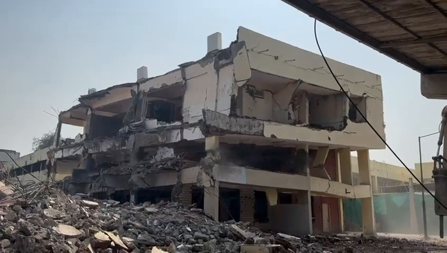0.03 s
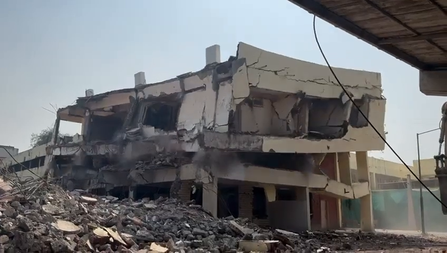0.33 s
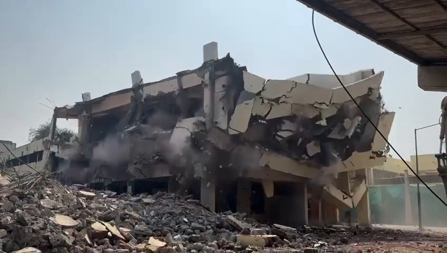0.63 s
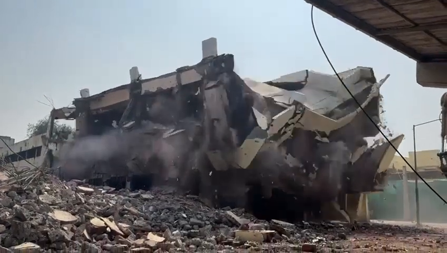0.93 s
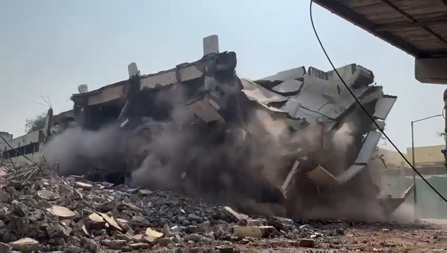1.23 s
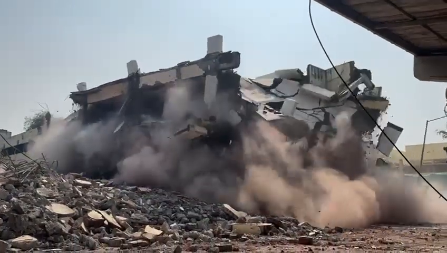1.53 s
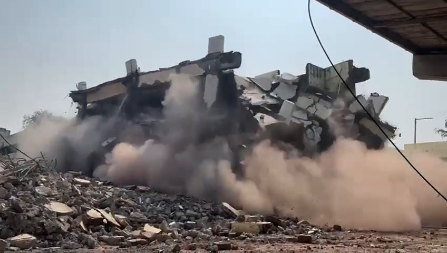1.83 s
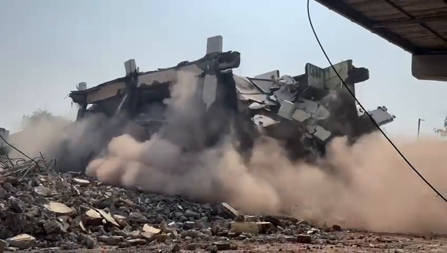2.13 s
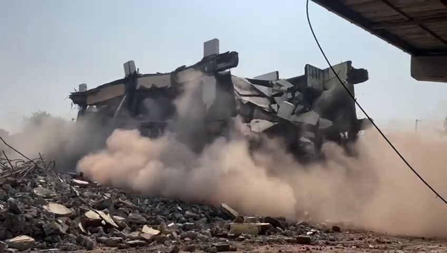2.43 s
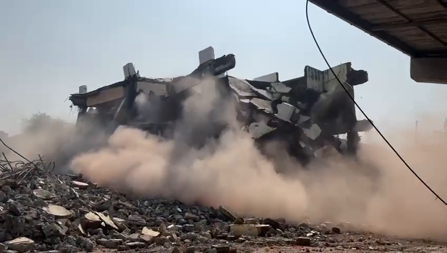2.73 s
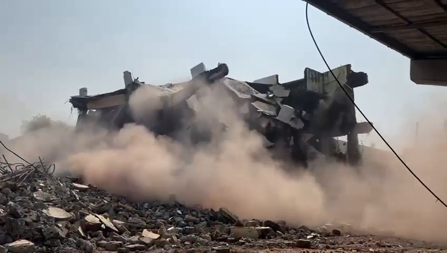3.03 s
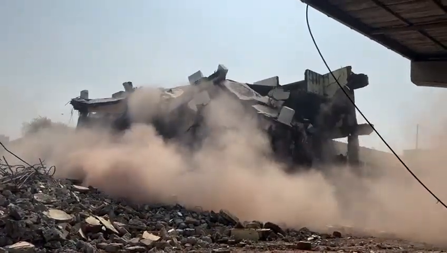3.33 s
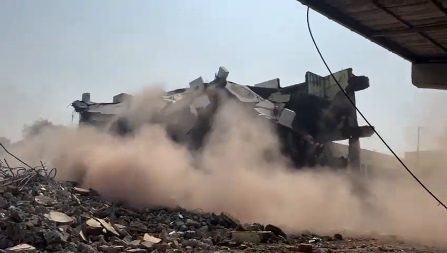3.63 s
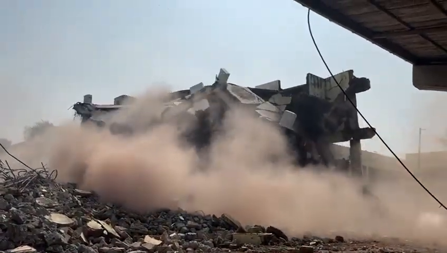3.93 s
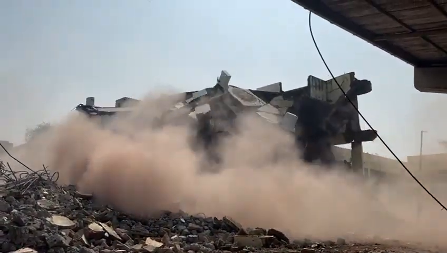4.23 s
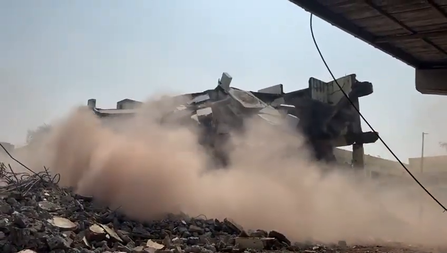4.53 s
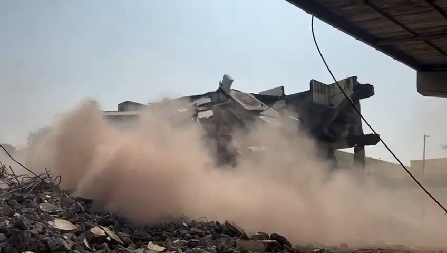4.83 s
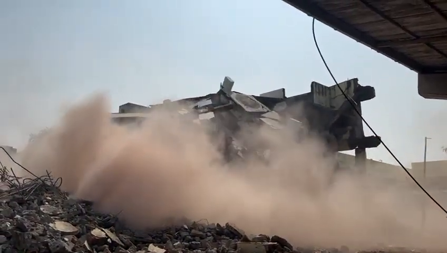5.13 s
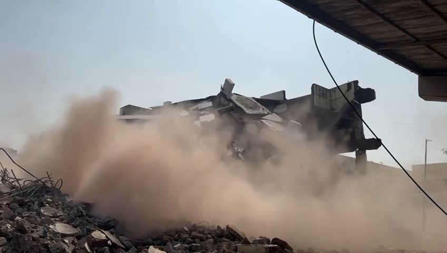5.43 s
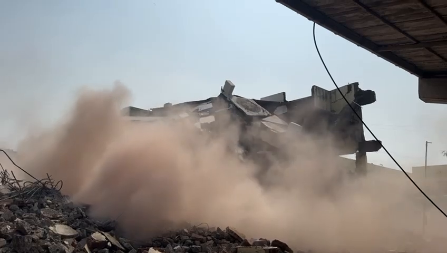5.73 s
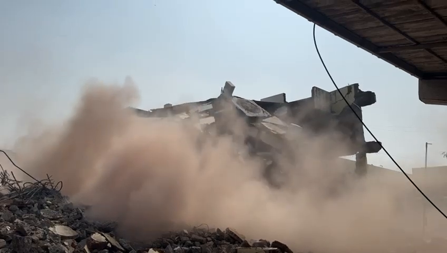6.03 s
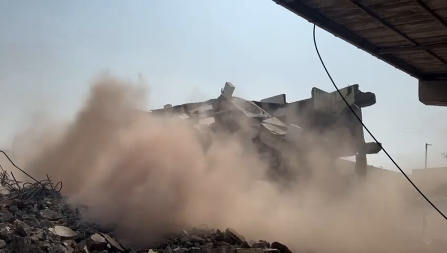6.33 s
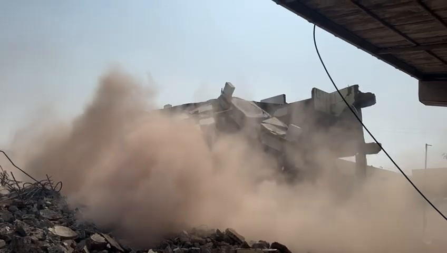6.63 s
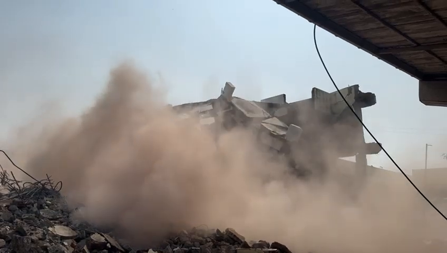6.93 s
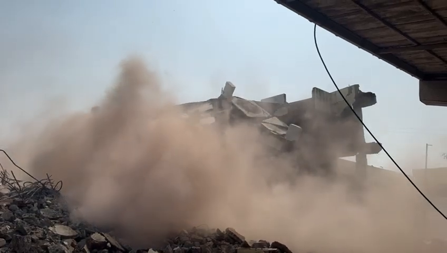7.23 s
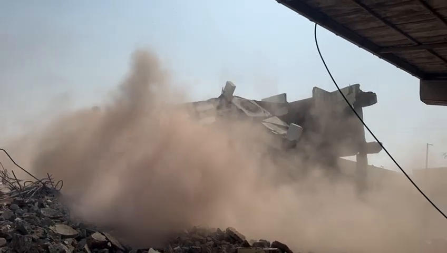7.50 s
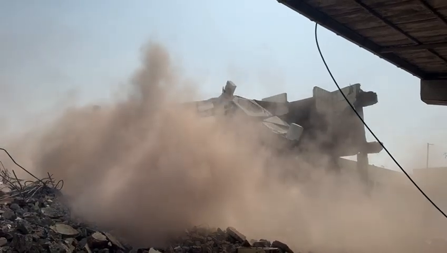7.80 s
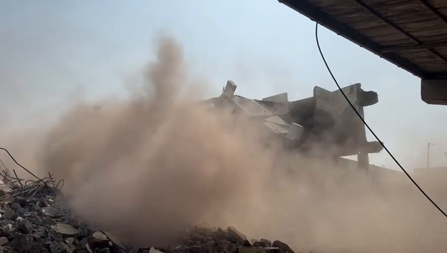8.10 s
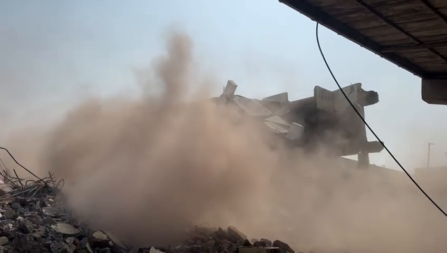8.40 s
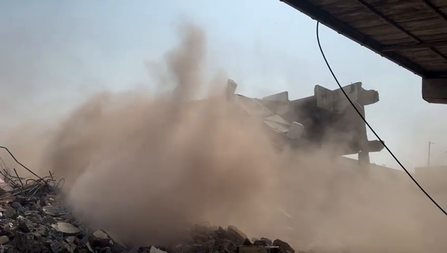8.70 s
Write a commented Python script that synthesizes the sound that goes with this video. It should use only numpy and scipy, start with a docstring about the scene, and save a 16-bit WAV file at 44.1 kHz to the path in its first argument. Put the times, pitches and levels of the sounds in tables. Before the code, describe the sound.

On an open demolition site, a stereo microphone some way off picks up a building collapsing. Deep booms and heavy thuds come in quick succession inside a dense roar of crunching concrete and hissing grit. The noise slowly dies down into scattered clacks, clinks, scrapes and small metal squeaks with short echoes. Behind the settling rubble, a quiet diesel engine speeds up briefly and falls back to idle.

```python
"""An open demolition site, some tens of metres from a concrete building, on a close-set stereo microphone.
The building caves in at once: section after section booms over a roar of colliding chunks and chips,
while slabs thud and gravel spills. From two seconds on the roar thins, and blocks knock and scrape,
shards clink and steel bars squeak in the clear. Near five seconds a diesel machine revs in the background;
by seven it has dropped to a low drone, and the last pieces tumble as the rubble settles."""
import sys
import numpy as np
from scipy import signal
from scipy.fft import rfft, irfft
from scipy.io import wavfile

SR = 44100
rng = np.random.default_rng(int(sys.argv[2]) if len(sys.argv) > 2 else 0)


def file_out(sig):
    """Save sig as 16-bit WAV at sys.argv[1]."""
    # one column per channel
    cols = np.atleast_2d(sig).T
    # limit, then scale
    lim = np.clip(cols, -1, 1)
    pcm = np.round(lim * 32767).astype(np.int16)
    wavfile.write(sys.argv[1], SR, pcm)


N = 395136
TIME = np.arange(N) / SR

# how much rubble is on the move: (time [s], relative level [dB])
RUBBLE_FLOW = [(0, -3), (.11, -6), (.4, -2), (.55, -1), (.7, 0.5), (.87, -1.5), (1.0, -2), (1.09, -3),
               (1.17, -0.5), (1.5, -1), (1.72, -5.5), (2.15, -8.5), (4.1, -14.5), (5.1, -17.5),
               (6.4, -19.5), (7.4, -24.5), (7.9, -30), (8.45, -28.5), (8.96, -28)]
# sections giving way: (time [s], length [s], boom of the floors [dB], crunch of the slabs [dB])
CRASHES = [(0, 0.031, -24, -19), (0.147, 0.032, -14.5, -18.5), (0.217, 0.22, -21, -21.5),
           (0.423, 0.078, -15, -22.5), (0.575, 0.25, -16, -21.5), (0.863, 0.056, -14, -38),
           (1.115, 0.2, -18, -16), (1.346, 0.24, -15.5, -17.5), (1.597, 0.049, -22, -23),
           (1.778, 0.31, -28.5, -26), (2.186, 0.044, -18, -22.5), (2.337, 0.32, -25, -26.5),
           (2.986, 0.36, -40, -32), (4.168, 0.22, -42, -30.5), (5.2, 0.52, -50, -40),
           (6.785, 0.029, -33, -44)]
# colour of the roar, and a trim for the sand at its top: (frequency [Hz], relative level [dB])
ROAR_SPECTRUM = [(18, -37), (30, -13.5), (70, 7.5), (118, -4.5), (169, -4), (502, -12), (592, -14),
                 (974, -12), (1180, -15), (1720, -17.5), (2340, -22), (8600, -33), (11200, -65),
                 (18900, -120)]
SAND_TRIM = [(5000, -2.5), (8300, -2.5), (10300, -3.5)]
# heavy slabs landing: (time [s], level [dB], pitch [Hz], swell [s])
THUDS = [(.367, -7.5, 233, .015), (.452, -13, 109, 0.01), (0.765, -8, 48, 0.015), (1.12, -7.5, 313, 0.0045),
         (1.122, -1.5, 136, .013), (1.182, -7, 234, 0.0055), (1.225, -6, 176, 0.0083),
         (1.251, -5, 300, 0.0042), (1.273, -6, 100, 0.007), (1.408, -9, 125, 0.0076),
         (1.358, -4.5, 258, 0.0057), (1.504, -4, 417, 0.004), (1.527, -9.5, 200, 0.0047),
         (1.559, -6, 270, 0.0043), (1.719, -11, 185, 0.0085), (2.211, -14, 186, 0.0092),
         (2.222, -14.5, 60, 0.0097), (2.574, -13, 265, 0.0054), (3.009, -17, 215, .012),
         (3.15, -22, 289, 0.0063), (4.198, -18, 197, 0.0049), (4.232, -18, 260, 0.0041),
         (4.253, -15, 240, 0.0045), (4.285, -13.5, 280, 0.005), (4.325, -28, 180, 0.015),
         (6.117, -21.5, 285, 0.0089), (6.14, -24, 188.5, 0.0147), (6.297, -24, 169, .0045),
         (6.448, -21, 267, 0.0057), (6.47, -27, 160, 0.0057), (6.79, -28, 170, 0.0087),
         (6.82, -28, 99.7, 0.0085), (6.838, -26, 150, 0.0062), (7.286, -27, 370, 0.0079),
         (7.505, -25, 200, 0.0048), (7.539, -30, 97, 0.0077), (7.65, -22.5, 250, 0.0051),
         (7.718, -29, 390, 0.0048), (7.858, -35, 340, .004), (8.239, -31, 290, 0.00395),
         (8.36, -23, 312, 0.0072), (8.461, -28, 100.2, 0.0043)]
# blocks knocking, shards and bar ends clinking: (time [s], level [dB], pitch [Hz], 60 dB decay [s])
KNOCKS = [(.1945, -3, 760, .012), (.195, -5, 1350, .01), (.203, -9, 910, .03), (.812, -2, 940, 0.03),
          (1.35, -6, 762, .04), (1.897, -16, 3300, .018), (2.576, -14, 802, 0.1), (2.852, -10, 1270, 0.022),
          (2.96, -24, 947, .05), (3.452, -18, 638, .1), (3.474, -24, 930, 0.05), (4.452, -19, 1023, 0.044),
          (4.451, -25, 2080, 0.023), (4.698, -19, 1126, 0.035), (4.728, -22, 1260, 0.068),
          (4.828, -26, 1710, 0.06), (4.83, -19, 950, 0.036), (4.862, -26, 1700, .03),
          (5.288, -23, 950, .05), (5.658, -22, 1830, 0.045), (5.72, -26, 2026, .04),
          (6.29, -26, 2100, 0.025), (6.293, -24, 1200, 0.033), (6.427, -21.5, 2170, 0.023),
          (6.448, -22, 1790, .03), (7.128, -28, 1830, 0.062), (7.462, -27, 1690, .035),
          (7.5, -26, 2003, .02), (7.503, -25, 1000, 0.024), (7.638, -29, 1500, .015),
          (7.955, -37, 2143, .04), (7.978, -36, 1314, 0.04), (8.186, -39, 2900, .03),
          (8.455, -34, 999, .04), (8.342, -35, 2103, 0.031), (8.592, -23, 1030, 0.05),
          (8.615, -29, 2000, 0.031), (8.778, -28, 1165, 0.04), (8.799, -31, 1894, .03)]
CLINKS = [(1.765, -23, 2620, .06), (2.694, -32, 3940, .05), (3.263, -21.5, 2970, 0.15),
          (3.312, -29, 2965, .11), (3.326, -26, 3290, .08), (3.36, -32, 4995, .09),
          (3.708, -31, 4760, 0.15), (3.73, -24.5, 3789, .06), (3.733, -31, 6100, .06),
          (3.756, -26, 3140, .11), (3.79, -31, 4048, .12), (3.948, -32, 4823, .04), (4.462, -36, 3962, .05),
          (5.622, -34, 3962, .05), (5.742, -33, 3186, 0.085), (5.843, -35, 5100, .05),
          (6.359, -34, 5167, .07), (6.372, -35, 3180, 0.12), (7.131, -41, 5081, .05),
          (7.137, -37, 3359, .05), (7.398, -41, 5770, .12), (8.58, -38, 3200, .09), (8.612, -34, 2940, .05),
          (8.778, -39, 3014, .06)]
# how a slab, a block and a shard ring: (multiple of the pitch [ratio], level [dB])
SLAB_MODES = [(1, -4), (1.5, -9), (.62, -8)]
BLOCK_MODES = [(1, -2), (1.17, -10), (1.55, -12), (2.3, -17)]
SHARD_MODES = [(1, -1), (1.02, -11), (1.44, -9), (2.07, -14)]
# gravel spilling off the ruin: (time of the crest [s], half length [s], level [dB], treble corner [Hz])
SPILLS = [(0.01, 0.022, -30, 8800), (0.594, 0.013, -23, 6860), (0.638, 0.019, -27, 5000),
          (0.697, 0.024, -21.5, 7000), (.755, 0.038, -26, 2000), (0.956, 0.025, -23, 3500),
          (1.019, 0.031, -24, 5450), (1.461, 0.026, -23.5, 5500), (1.554, 0.043, -27.5, 8980),
          (2.477, 0.027, -34, 8000), (3.75, 0.036, -32, 4800), (4.02, 0.17, -40, 10100),
          (4.85, 0.019, -39, 3500), (5.915, 0.014, -38, 7500), (6.296, .013, -42, 4000),
          (6.437, 0.027, -43, 3200), (7.319, .03, -41, 1300), (7.399, 0.019, -34.5, 2500),
          (7.46, 0.025, -41, 1800), (7.501, 0.0094, -43, 2400), (8.189, 0.01, -46, 5500),
          (8.225, .01, -47, 9020), (8.306, .006, -45, 7000), (8.345, .007, -42.5, 2190),
          (8.584, 0.02, -42.5, 1100), (8.616, 0.022, -37.5, 2010), (8.797, 0.018, -45.5, 2400)]
# slabs dragging over one another: (time [s], length [s], level [dB], centre [Hz], width [octaves])
SCRAPES = [(2.854, 0.041, -26.5, 1370, .35), (2.893, .11, -29.5, 1150, 1), (4.822, .07, -38, 1400, 1.0),
           (7.374, 0.13, -37.5, 1630, .3), (7.95, .06, -49, 1900, .9), (8.5, .07, -45.5, 1300, .5),
           (8.559, .055, -34.5, 1030, 0.24), (8.598, .05, -41, 1200, .6)]
# steel bars on concrete: (time [s], length [s], level [dB], pitch [Hz])
SQUEAKS = [(2.796, 0.033, -27, 850), (3.124, .05, -36, 2050), (3.333, 0.032, -36, 1647),
           (3.363, 0.046, -33, 2144), (3.47, 0.033, -31.5, 1105), (5.108, 0.048, -35.5, 1205),
           (5.784, .06, -40, 1456), (6.025, 0.032, -36, 1447), (6.739, 0.039, -38, 1500),
           (7.218, .035, -42, 1810)]
# the diesel working, revving, then idling: (time [s], firing rate [Hz])
ENGINE_SPEED = [(0, 79.7), (3.4, 75.1), (4.5, 75), (5.0, 92.1), (6.05, 91.8), (6.45, 79.4), (6.6, 66.5),
                (6.95, 54.6), (8.96, 53)]
# exhaust harmonics ahead of the muffler, from the first up: (relative level [dB])
EXHAUST_HARMONICS = [-1.5, -24, -10.5]
# echoes off the ground, a roof and walls: (delay [s], level [dB])
ECHOES = [(0.009, -13.5), (.027, -13.5), (.049, -13), (.083, -15)]
# how alike left and right arrive at the microphone: (frequency [Hz], correlation [0..1])
STEREO_LIKENESS = [(60, 1), (150, 0.99), (300, 1), (450, 0.89), (640, 0.33), (900, 0.79), (1500, 0.56),
                   (2700, 0.75), (6000, 0.67), (8000, 1)]
# left against right, out of phase near 9-10 kHz: (frequency [Hz], phase lead [rad])
LEFT_RIGHT_PHASE = [(60, 0.07), (250, -0.35), (560, -0.8), (850, 0.5), (1400, -1.2), (2100, 0.1),
                    (3600, 0.71), (6500, 0.47), (8400, 0), (9200, -3.5), (10000, -4), (10900, -6.5)]
# the left microphone port against the right: (frequency [Hz], level [dB])
PORT_BALANCE = [(60, 0), (470, 0.9), (700, -0.5), (1200, 0.8), (1700, -1), (3000, 1.5), (7000, 2),
                (8500, 0)]

# each size of debris: level at full flow [dB], share of the flow's swing that it follows
FLOORS_DB, FLOORS_FOLLOW = -22.5, 0.77
SLABS_DB, SLABS_FOLLOW = -18, 0.88
CHUNKS_DB, CHUNKS_FOLLOW = -18, 0.96
GRIT_DB, GRIT_FOLLOW = -27.5, 0.85
SAND_DB, SAND_FOLLOW = -32, 0.78
BRICKS_DB, BRICKS_FOLLOW = -28, 0.87
STONES_DB, STONES_FOLLOW = -17.5, .7


def roar():
    """The collapse: a few big pieces sound low, many small ones high; crashes add to the big ones."""
    flow_db, = in_time(RUBBLE_FLOW)
    boom, crunch = crashes(attack_s=0.02, release_s=0.073)
    edges_hz = [34, 48, 70, 110, 165, 245, 365, 550, 740, 1000, 1350, 1900, 2600, 3500, 4600, 6000,
                7500, 9000, 12000]
    floors = rubble(edges_hz[:4], per_s=90, spread_db=4, wash_db=-4, surge_db=1.35, patchy_db=-1.1)
    slabs = rubble(edges_hz[3:8], per_s=170, spread_db=0.5, wash_db=-1.5, surge_db=1.05, patchy_db=1.5)
    chunks = rubble(edges_hz[7:13], per_s=350, spread_db=1.5, wash_db=2, surge_db=1.03, patchy_db=0.5)
    grit = rubble(edges_hz[12:16], per_s=900, spread_db=-1, wash_db=1.5, surge_db=0.45, patchy_db=1)
    sand = rubble(edges_hz[15:], per_s=1000, spread_db=1, wash_db=1.5, surge_db=0.8, patchy_db=1.2)
    bricks = brick_clatter(per_s=110, ring_cycles=52, tilt_db=-2.5, spread_db=9.5)
    return (floors * np.hypot(boom, from_db(FLOORS_DB + FLOORS_FOLLOW * flow_db))
            + slabs * np.hypot(crunch, from_db(SLABS_DB + SLABS_FOLLOW * flow_db))
            + chunks * from_db(CHUNKS_DB + CHUNKS_FOLLOW * flow_db)
            + grit * from_db(GRIT_DB + GRIT_FOLLOW * flow_db)
            + sand * from_db(SAND_DB + SAND_FOLLOW * flow_db)
            + bricks * from_db(BRICKS_DB + BRICKS_FOLLOW * flow_db))


def crashes(attack_s, release_s):
    """Envelopes of boom and crunch: each section hits fast, grinds on for its length and dies away."""
    power = np.zeros((2, N))
    for s, length_s, boom_db, crunch_db in CRASHES:
        age = np.maximum(TIME - s, 0)
        shape = (1 - np.exp(-age / attack_s)) * np.exp(-np.maximum(age - length_s, 0) / release_s)
        power += (from_db([[boom_db], [crunch_db]]) * shape) ** 2
    return np.sqrt(power)


def rubble(edges_hz, per_s, spread_db, wash_db, surge_db, patchy_db):
    """Pieces of one size collide over a wash of scattered sound; bands swell singly and together."""
    out, surge = 0, drift(7.5)
    for low, high in zip(edges_hz, edges_hz[1:]):
        hz = np.sqrt(low * high)
        wash, side = rng.standard_normal((2, N))
        mid = rms_one(collisions(per_s, spread_db) + from_db(wash_db) * wash)
        band = stereo(*filtered([mid, side], "band", [low, high], order=3), hz)
        colour_db = at_hz(ROAR_SPECTRUM, min(hz, 8000)) + at_hz(SAND_TRIM, hz)
        out = out + band * from_db(colour_db + patchy_db * drift(17.5))
    return rms_one(out * from_db(surge_db * surge))


def collisions(per_s, spread_db):
    """Pieces strike each other at random: clicks of uneven size, rms 1."""
    sizes = from_db(spread_db * np.minimum(rng.exponential(1, N), 4))
    return rms_one(sizes * rng.choice([-1, 1], N) * (rng.random(N) < per_s / SR)) + 1e-18


def brick_clatter(per_s, ring_cycles, tilt_db, spread_db, count=3000):
    """Bricks and tiles clink at random and echo round the site, each at its own pitch and place."""
    out, t = np.zeros((2, N)), TIME[:SR // 8]
    across = np.array([[1], [-1]])
    gaps, pitches, sizes, places, lags = rng.random((count, 5)).T
    times = np.cumsum(-np.log(1 - gaps)) / per_s
    for s, pitch, size, place, lag in zip(times, pitches, sizes, places, lags):
        if s < TIME[-1]:
            hz = 850 * 10 ** pitch
            age = np.log(1000) * hz * t / ring_cycles
            envelope = age * np.exp(-age)   # a tumbling piece builds up its ring
            ring = envelope * np.sin(2 * np.pi * hz * t + across * (lag - .5) * 2)
            pan_db = across * (place - .5) * 1.6
            add(out, s, ring * from_db(spread_db * size + tilt_db * np.log2(hz) + pan_db))
    return rms_one(site_echoes(out))


def slab_thuds(crush_db, crush_width):
    """A slab lands on yielding rubble: the push swells and dies in a few cycles, with some crushing."""
    out, t = np.zeros((2, N)), TIME[:SR // 8]
    for s, level_db, hz, swell_s in THUDS:
        push = (t / swell_s * np.exp(1 - t / swell_s)) ** 3
        body = sum(from_db(db) * np.cos(2 * np.pi * hz * ratio * (t - swell_s))
                   for ratio, db in SLAB_MODES)
        crush = from_db(crush_db) * crushing(hz, crush_width, len(t))
        add(out, s, from_db(level_db) * push * (body + crush))
    return out


def blows(rows, modes, crush_db, crush_width, rise_share):
    """A struck block, shard or stone rings a few damped modes as the contact crushes."""
    out, t = np.zeros((2, N)), TIME[:SR // 7]
    for s, level_db, hz, t60 in rows:
        ring = 0
        for ratio, db in modes:
            mode_hz = hz * ratio * (1 + 0.068 * np.log(ratio) * rng.normal())
            ring += np.sin(2 * np.pi * mode_hz * t) * from_db(db - 60 * t * np.sqrt(ratio) / t60)
        crush = crushing(hz, crush_width, len(t)) * from_db(crush_db - 60 * t / t60)
        attack = 1 - np.exp(-t / (rise_share * t60))   # short cracks are the sharpest
        add(out, s, from_db(level_db) * (ring + crush) * attack)
    return out


def crushing(hz, width, samples):
    """A contact crumbles: a band of noise reaching a factor of width either side of the pitch."""
    noise = filtered(rng.standard_normal((2, samples)), "band", [hz / width, hz * width])
    return stereo(*rms_one(noise), hz)


def gravel_spills():
    """A load of gravel slides off: a dense rattle of small stones that swells and dies quickly."""
    out = np.zeros((2, N))
    stones = stereo(collisions(per_s=1500, spread_db=1.5), collisions(per_s=3700, spread_db=2), hz=7400)
    stones = filtered(stones, "high", 550)
    for s, half_s, level_db, corner_hz in SPILLS:
        during = np.abs(TIME - s) < 4 * half_s
        rattle = filtered(stones[:, during], "low", corner_hz, order=1)
        rattle = filtered(rattle, "low", 1.97 * corner_hz)   # coarse loads have little fine grit
        swell = np.exp(-.5 * ((TIME[during] - s) / half_s) ** 2)
        out[:, during] += rms_one(rattle) * from_db(level_db) * swell
    return out


def stray_stones(per_s, low_hz, high_hz, spread_db, tilt_db, t60, bounce_s, bounce_loss_db, count=100):
    """Stones land on the heap with a dry clack and bounce once; small ones are higher and weaker."""
    gaps, pitches, sizes, hops = rng.random((count, 4)).T
    s = np.cumsum(-np.log(1 - gaps)) / per_s
    octaves = pitches * np.log2(high_hz / low_hz)
    flow_db = np.interp(s, *np.transpose(RUBBLE_FLOW))
    level_db = STONES_DB + STONES_FOLLOW * flow_db + spread_db * sizes + tilt_db * octaves
    hz, ring_s = low_hz * 2 ** octaves, np.full(count, t60)
    landings = np.c_[s, level_db, hz, ring_s]
    bounces = np.c_[s + bounce_s * (.5 + hops), level_db - bounce_loss_db, hz, ring_s]
    rows = np.vstack([landings, bounces])
    return blows(rows[rows[:, 0] < TIME[-1]], BLOCK_MODES, crush_db=-6, crush_width=1.7, rise_share=.03)


def slab_scrapes(slips_per_s, spread_db, edge_share):
    """Concrete drags over concrete: uneven slips rattle one broad resonance of the slab."""
    out = np.zeros((2, N))
    slips = np.array([collisions(slips_per_s, spread_db) for _ in range(2)])
    for s, length_s, level_db, hz, octaves in SCRAPES:
        during = (TIME >= s) & (TIME < s + length_s)
        width = 2 ** (octaves / 2)
        grind = stereo(*filtered(slips[:, during], "band", [hz / width, hz * width]), hz)
        fade = signal.windows.tukey(grind.shape[1], edge_share)
        add(out, s, from_db(level_db) * rms_one(grind) * fade)
    return out


def steel_squeaks(waver, edge_share):
    """Steel bars scrape along concrete and sing briefly on one wavering note, dead centre."""
    out = np.zeros((2, N))
    for s, length_s, level_db, hz in SQUEAKS:
        samples = int(length_s * SR)
        slip = rms_one(filtered(rng.standard_normal(samples), "low", 90))
        note = np.sqrt(2) * np.sin(2 * np.pi * np.cumsum(hz * (1 + waver * slip)) / SR)
        fade = signal.windows.tukey(samples, edge_share)
        add(out, s, from_db(level_db) * fade * np.array([note, note]))
    return out


def diesel(idle_hz, exhaust_db, muffler_hz, rumble_db, rumble_hz, db_per_hz):
    """Muffled exhaust tones on an unsteady firing rate, over the block's rumble; louder with speed."""
    firing_hz, = in_time(ENGINE_SPEED)
    phase = 2 * np.pi * np.cumsum(firing_hz * (1 + 0.0074 * drift(5.5))) / SR
    tones = sum(from_db(db + 1.8 * drift(9)) * np.sin(k * phase)
                for k, db in enumerate(EXHAUST_HARMONICS, 1))
    exhaust = from_db(exhaust_db) * rms_one(filtered(tones, "low", muffler_hz, order=1))
    rumble = from_db(rumble_db) * rms_one(filtered(rng.standard_normal(N), "band", rumble_hz))
    return (exhaust + rumble) * from_db(db_per_hz * (firing_hz - idle_hz))


def site_echoes(x):
    """The direct sound and a few dull echoes, reaching each side of the microphone slightly apart."""
    out, dull = x.copy(), filtered(x, "low", 4800, order=1)
    for delay_s, level_db in ECHOES:
        echo = np.array([np.roll(side, rng.integers(0, 24)) for side in dull])
        add(out, delay_s, from_db(level_db) * echo)
    return out


def stereo(mid, side, hz):
    """Direct sound is shared by both channels, scattered sound is not."""
    alike = np.clip(at_hz(STEREO_LIKENESS, hz), 0, .999)
    return (np.sqrt(1 + alike) * mid + np.sqrt(1 - alike) * side * np.array([[1], [-1]])) / np.sqrt(2)


def drift(rate_hz):
    """A slow random wander with spread 1."""
    step, settle = 40, 2000
    pole = np.exp(-2 * np.pi * rate_hz * step / SR)
    noise = rng.standard_normal(N // step + settle + 2)
    slow = signal.lfilter([1], [1, -2 * pole, pole * pole], noise)[settle:]
    return np.interp(np.arange(N) / step, np.arange(len(slow)), rms_one(slow))


def from_db(db):
    return 10 ** (np.asarray(db) / 20)


def rms_one(x):
    return x / np.sqrt(np.mean(x ** 2) + 1e-20)


def in_time(rows):
    """Each column of a curve, sample by sample."""
    s, *columns = np.transpose(rows)
    return [np.interp(TIME, s, c) for c in columns]


def at_hz(points, hz):
    """A spectrum read on a log-frequency axis."""
    point_hz, values = np.transpose(points)
    return np.interp(np.log(hz), np.log(point_hz), values)


def filtered(x, kind, hz, order=2):
    """Butterworth filter."""
    return signal.sosfilt(signal.butter(order, np.clip(hz, 10, .45 * SR), kind, fs=SR, output="sos"), x)


def add(out, s, sound):
    """Mix a short stereo sound in at time s."""
    start = int(np.clip(s * SR, 0, N - 1))
    out[:, start:start + sound.shape[1]] += sound[:, :N - start]


def scene():
    """From the microphone's spot: the roar, single pieces with their echoes, and the machine behind."""
    thuds = slab_thuds(crush_db=-18.5, crush_width=2.6)
    knocks = blows(KNOCKS, BLOCK_MODES, crush_db=-8, crush_width=1.7, rise_share=0.035)
    clinks = blows(CLINKS, SHARD_MODES, crush_db=-14, crush_width=1.4, rise_share=0.01)
    clacks = stray_stones(per_s=9, low_hz=1100, high_hz=4400, spread_db=3.5, tilt_db=-2.5, t60=.03,
                          bounce_s=.06, bounce_loss_db=2)
    squeaks = steel_squeaks(waver=0.009, edge_share=0.24)
    scrapes = slab_scrapes(slips_per_s=900, spread_db=1, edge_share=0.33)
    collapse = roar()
    pieces = site_echoes(thuds + knocks + clinks + clacks + squeaks + scrapes + gravel_spills())
    machine = diesel(idle_hz=54, exhaust_db=-40, muffler_hz=175, rumble_db=-47.5, rumble_hz=(78, 155),
                     db_per_hz=0.0466)
    return collapse + pieces + machine


def record(dry):
    """Left and right part in phase and level; then a bass cut, rounded peaks and a steep top cut."""
    bass_cut_hz, top_cut_hz = 35, 11800
    hz = np.maximum(np.arange(N // 2 + 1) * SR / N, 1)
    half = np.array([[.5], [-.5]])
    response = np.exp(1j * at_hz(LEFT_RIGHT_PHASE, hz) * half) * from_db(at_hz(PORT_BALANCE, hz) * half)
    channels = filtered(irfft(rfft(dry) * response, N), "high", bass_cut_hz, order=4)
    rounded = channels / (1 + channels ** 6) ** (1 / 6)
    return signal.sosfilt(signal.ellip(10, .2, 90, top_cut_hz, fs=SR, output="sos"), rounded)


dry = scene()
out = record(dry)
file_out(out)
```